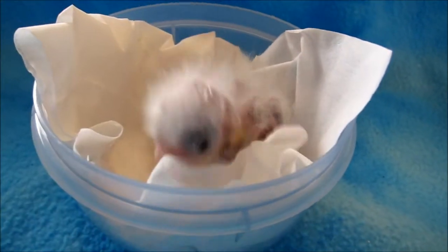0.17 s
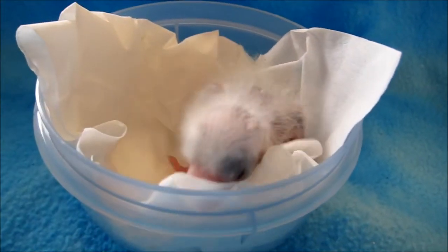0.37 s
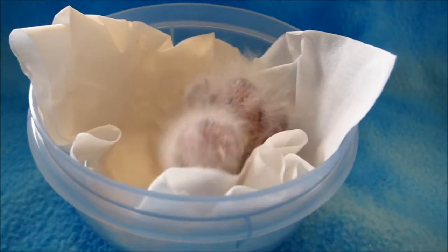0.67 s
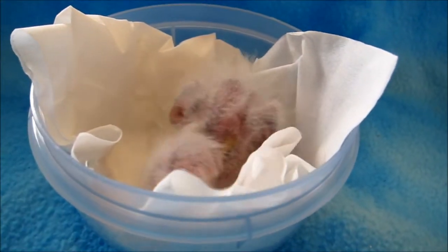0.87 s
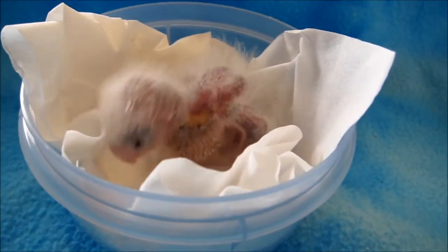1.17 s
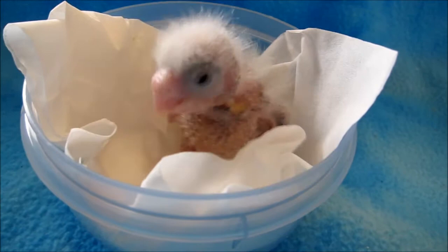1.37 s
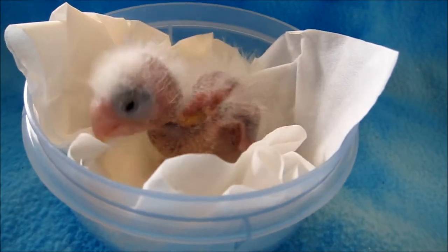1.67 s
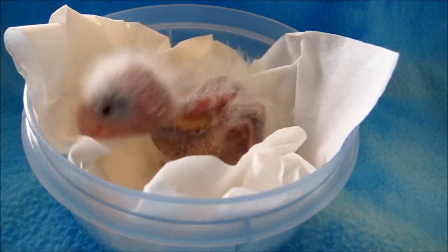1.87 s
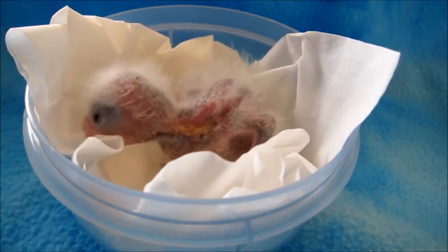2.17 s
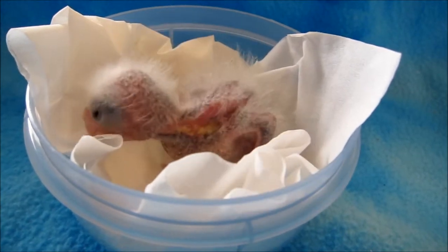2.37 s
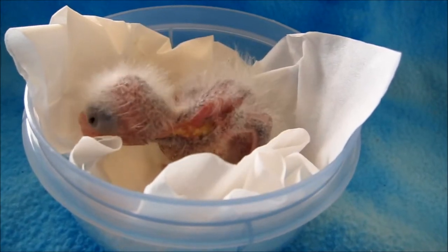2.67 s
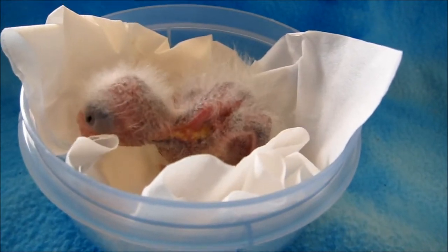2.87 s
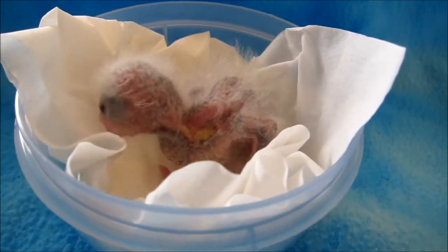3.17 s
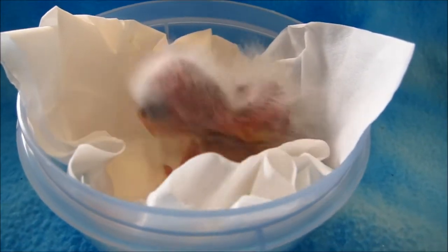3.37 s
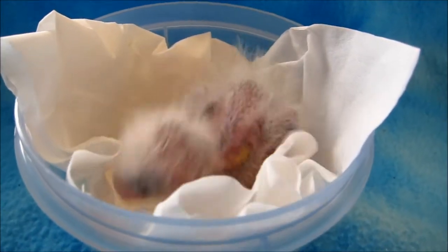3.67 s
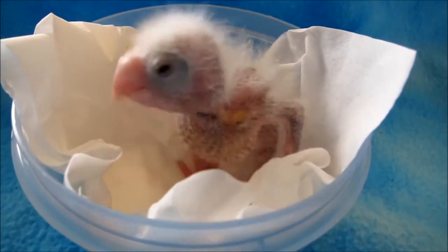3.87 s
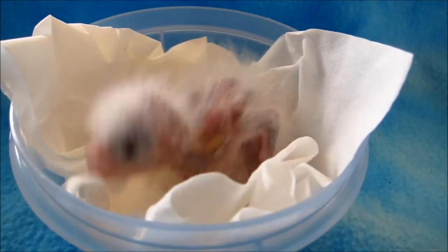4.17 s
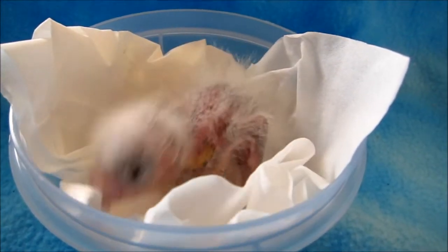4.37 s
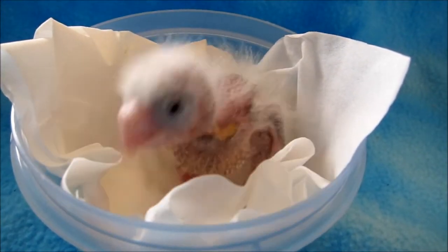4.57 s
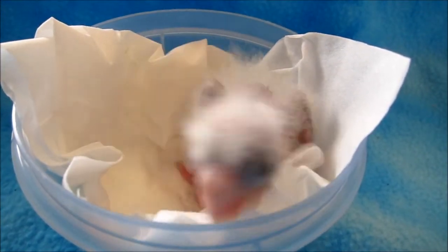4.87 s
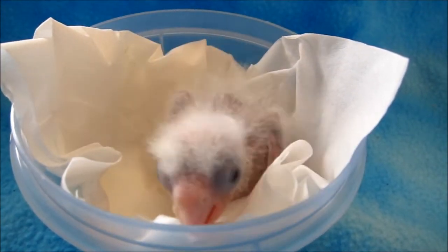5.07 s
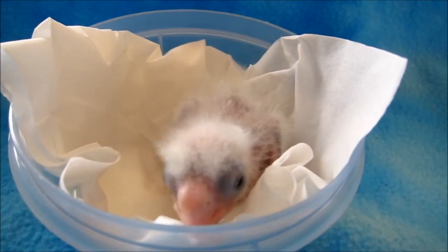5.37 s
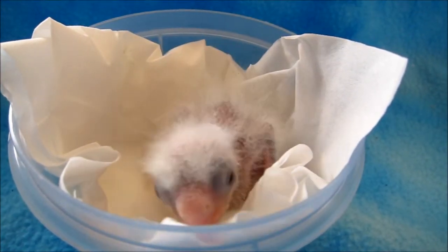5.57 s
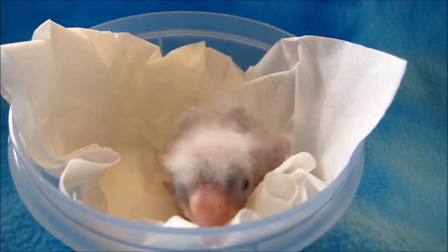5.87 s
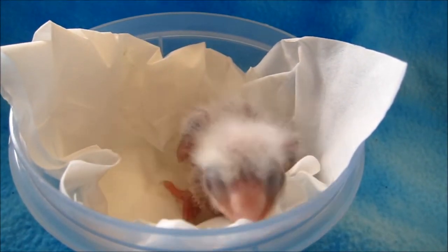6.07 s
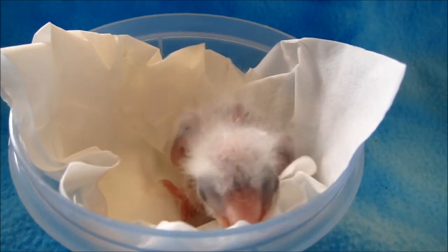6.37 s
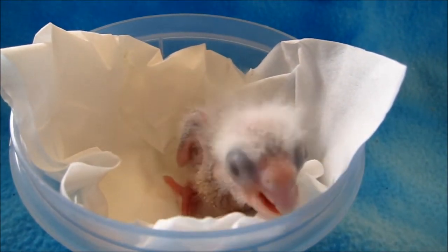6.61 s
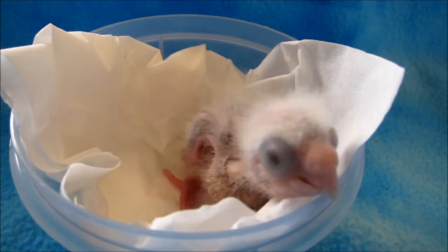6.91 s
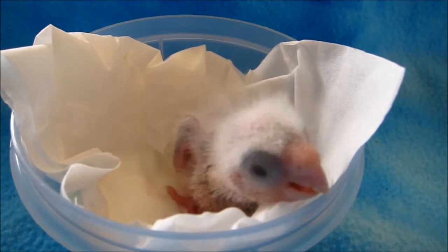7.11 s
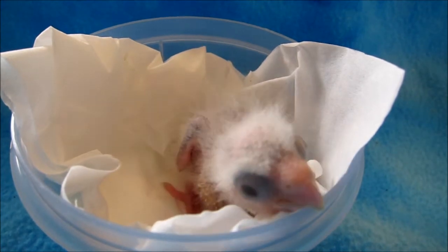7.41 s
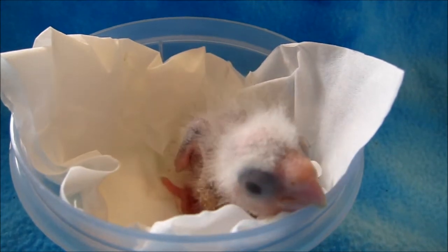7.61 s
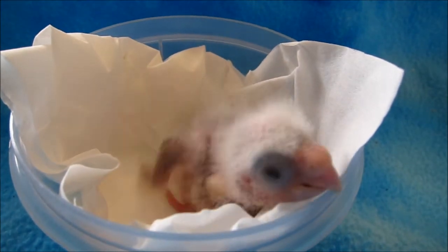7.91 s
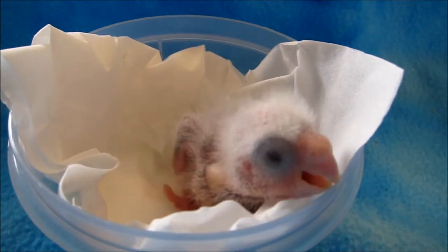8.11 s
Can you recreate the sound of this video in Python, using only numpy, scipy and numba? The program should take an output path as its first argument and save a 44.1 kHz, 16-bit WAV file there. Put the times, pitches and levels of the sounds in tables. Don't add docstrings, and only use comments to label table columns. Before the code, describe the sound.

A baby parrot calls about every second and a half: four rapid peeps, then a breathy, whistling rasp or near silence. The rasps begin soft, swell before the third run, fade, then return loudest before the last peeps. A thin whistle lingers briefly in the fifth run. Close stereo pickup, low hum dipping after the peeps, slight bowl and room echo.

```python
import sys
import numpy as np
from scipy import signal
from scipy.fft import rfft, irfft, next_fast_len
from scipy.io import wavfile
from scipy.ndimage import uniform_filter1d
from numba import njit

SR = 44100
rng = np.random.default_rng(int(sys.argv[2]) if len(sys.argv) > 2 else 0)


def voltage_ratio(decibels):
    exponent = np.asarray(decibels, float) / 20
    return 10 ** exponent


def master(y):
    cut = np.clip(np.atleast_2d(y).T, -1, 1)
    pcm = np.round(cut * 32767)
    wavfile.write(sys.argv[1], SR, pcm.astype(np.int16))


N = 363825

# time_s, level_db
HUM = [(0.0, -52.5), (1.7, -46.5), (2.3, -47.5), (3.1, -51), (4.7, -50.5), (6.25, -50), (7.9, -46.5)]
# pitch_hz, level_db (per Hz)
HUM_COLOUR = [(15, -31), (30, -24), (60, -14), (300, -4), (500, -9), (1000, -13), (2000, -12.5),
              (4000, -68), (7000, -30), (10000, -28.5), (16000, -35)]
# start_s, drop_db, recovery_s
DUCKS = [(.38, -7, 0.21), (1.82, -17.5, 0.34), (3.45, -3.5, 1), (4.78, -13, 0.94), (4.9, -7, .3),
         (6.3, -5, .3), (6.45, -13, 1), (7.97, -14.5, 0.99)]
# time_s, level_db, spread_s
SHUFFLES = [(1.45, 3, .05), (3.24, 9.5, 0.06), (4.72, 4, 0.023), (5.5, 4, .06)]
# time_s, level_db, spread_s, pitch_hz, width_hz
RUBS = [
    (1.0, -58, .06, 170, 120),
    (1.22, -58, .2, 1400, 300),
    (1.45, -57, .07, 700, 250),
    (4.225, -58, .025, 1120, 200),
    (5.5, -57, .09, 290, 150),
    (5.75, -59, .1, 200, 150),
]
# start_s, level_db, pitch_hz
TICKS = [
    (3.19, -48, 410),
    (3.874, -43, 1100),
    (5.352, -44, 1050),
    (5.929, -47, 2480),
]
# time_s, pitch_hz, fourth_partial_db, second_and_third_db
WHIMPER = [(6.63, 1250, -90, -90), (6.67, 1247, -25.5, -33), (6.8, 1258, -34, -44), (6.88, 1300, -38, -60),
           (6.91, 1318, -27, -62), (6.94, 1310, -36, -70), (7.04, 1295, -37, -90), (7.14, 1265, -90, -90)]

# time_s, air_flow_db, main_resonance_hz, beak_opening_db
RASPS = [
    [(0.19, -67, 4200, -9.5)],
    [(0.8, -43.5, 4650, 3.5), (0.874, -38, 4540, -6.5), (0.992, -39, 4440, -1.3), (1.168, -35, 4470, -0.7),
     (1.646, -38, 4560, 2.8), (1.76, -42, 4000, 7)],
    [(2.33, -37.5, 4120, 6), (2.366, -36, 4250, 5), (2.46, -31, 4100, 3.5), (2.54, -29.5, 4560, 1),
     (2.68, -30.5, 4390, 2.5), (2.728, -21, 4620, 2.8), (2.816, -25, 4600, 0)],
    [(2.982, -39, 4680, 4), (3.21, -37.5, 4660, 2.2)],
    [(3.95, -58.5, 4740, -15)],
    [(4.238, -71.5, 4360, 3), (4.27, -58.5, 4150, 0), (4.458, -58, 4400, 3.5), (4.528, -65.5, 4350, 1.5),
     (4.7, -63.5, 4500, -6.5)],
]
# time_s, air_flow_db, main_resonance_hz, beak_opening_db
LATE_RASPS = [
    [(5.42, -82, 4800, -3), (5.456, -50, 4700, 1), (5.696, -43.5, 4720, 0), (6.25, -41.5, 4650, 1.5)],
    [(6.55, -70, 4560, .1), (6.665, -40, 4800, 6), (6.691, -32, 4900, 1), (6.711, -35.5, 4700, 6),
     (6.775, -29.5, 4750, 5.5)],
    [(6.91, -36, 4300, 4.5), (7.032, -25.5, 4430, -6), (7.148, -24.5, 4330, -4.5), (7.18, -18, 4374, -7.5),
     (7.43, -22.5, 4156, -1), (7.6, -22, 3950, -0.2), (7.68, -20.5, 3760, -1.5), (7.8, -20.5, 3660, -2.3),
     (7.92, -22.5, 3760, 0.3)],
    [(8.035, -46, 4300, 6.5), (8.2, -38.5, 4070, -2.5)],
]
RASP_WIDTH_HZ = [150, 300, 240, 480]
# pitch_hz, level_db
RASP_HISS = [(600, -59), (1300, -1), (2000, 8), (4500, 11.5), (7000, 11), (10300, 8.5), (13000, -5.5),
             (16000, -40)]
# first_db, second_db, fourth_db
RASP_COLOUR = [(-13, 16.5, 8.5), (-13, -5.5, -17), (-8, -10, -9.5), (-13, -5, -24.5), (9, 10, -5.5),
               (9, 11, 6), (-46, -23.5, -8), (-27.5, -12, -11.5), (-8, -12.5, -8.5), (-3, 4, -8)]
# first_share_of_main, second_hz, fourth_multiple_of_main
RASP_THROAT = [((.53, 3600, 1.43), (.53, 3500, 1.43)), ((.534, 3420, 1.3), (.534, 3050, 1.3)),
               ((.48, 3400, 1.47), (.49, 3400, 1.43)), ((.478, 3600, 1.32), (.478, 3440, 1.32)),
               ((.45, 3500, 1.42), (.45, 3500, 1.42)), ((.38, 3450, 1.54), (.48, 2500, 1.2)),
               ((.42, 3100, 1.27), (.42, 3400, 1.27)), ((.31, 3700, 1.42), (.31, 4100, 1.42)),
               ((.5005, 3250, 1.49), (.5005, 2960, 1.49)), ((.46, 3650, 1.36), (.46, 3600, 1.36))]
# time_s, level_db, spread_s
SURGES = [(7.21, -0.5, 0.013), (7.396, -4, 0.0063), (7.43, 5, 0.0052), (2.39, 6.5, 0.032),
          (2.49, -6.5, 0.039), (2.555, 5.5, 0.069)]

# start_s, length_s, crest_hz, crest_slope_hz, half_pitch_db
PEEPS = [(.2068, 0.093, 2506, -70, -13), (.346, 0.092, 2778, -161, -15.5), (.503, 0.09, 2693, -138, -39),
         (.6876, 0.094, 2545, -216, -36), (1.7675, .0865, 2442, 180, -12.5),
         (1.9046, .089, 2554, -400, -24), (2.051, 0.089, 2506, -170, -29), (2.2243, 0.086, 2406, -130, -26),
         (3.2315, 0.093, 2490, -84, -17), (3.369, 0.087, 2715, -243, -33), (3.5217, 0.084, 2487, -557, -27),
         (3.7326, 0.1, 2403, -480, -13.5), (4.7406, 0.094, 2330, 12, -13),
         (4.8786, 0.09, 2425, -120, -10.5), (5.0321, 0.087, 2336, -420, -14.5),
         (5.2214, 0.093, 2260, -380, -13), (6.2671, 0.097, 2403, 358, -17),
         (6.4155, 0.088, 2681, -212, -21), (6.5664, .0844, 2598, -52, -20), (6.7882, 0.1, 2262, -200, -41),
         (7.9283, 0.088, 2248, 20, -36), (8.0658, 0.087, 2434, -320, -22), (8.219, .088, 2410, -50, -24)]
# second_partial_db, then against it first_db, third_db, fourth_db; swell_db
RUNS = [(-13, 3, -3.5, -7, 5.5), (-12.5, 1.5, -8, -15.5, 7.5), (-12.5, 4, -7, -11, 8),
        (-13, 0.5, -3.5, -7.5, 0.5), (-11, 0.3, -2, -7, -0.4), (-12.5, -2, -2, -12.5, 3.5)]
# rise_ms, attack_ms
ONSETS = [(9.5, 9.9), (10.2, 6.2), (12.9, 5.5), (9.6, 19.2), (10.3, 13.7), (11.7, 13.3)]
# level_db, first_db, fourth_db, swell_db, attack_share
PLACES = [(-0.9, 2.05, 1.5, 2.3, 0.52), (0.94, -0.85, 1.7, -2.5, 1.08), (-0.1, 0.8, 1.2, 0.1, 1.23),
          (-0.8, 0.15, -1.5, -3.5, 1.06)]
# level_db, first_db, third_db, fourth_db, upper_db
EFFORT = [(-2, 1, 3, 3, 0), (0, -1, 2, 0, 0), (0, -2, 1, -1, 2), (0, -1, -3, -3, -3), (0, -2, 1, 2, 0),
          (0, -1, 0, -1, -5), (0, -2, 0, -2, -8), (0, -3, -2, -1, -3), (0, -2, -1, 0, 2),
          (1, -6, 0, -2, -6), (-1, -3, -1, -4, -3), (-1, 0, 0, 0, 6), (0, -2, -1, -1, -3), (0, 0, 2, 0, -3),
          (0, -2, -1, -1, -2), (0, 0, -1, -2, 2), (0, -2, -1, 0, -2), (1, -2, 0, -2, -3), (0, -1, 1, 0, -1),
          (1, -2, 0, 0, 0), (0, 0, -1, -6, 0), (-1, 0, 0, -2, -3), (0, 0, 0, 0, 0)]
# tightening_share, letting_go_ms, half_pitch_patch_place (share of length),
# patch_spread (share of length), first_puff_db
MANNER = [(.95, 6.6, .5, .2, -15), (.95, 8, .1, .3, -19), (1.05, 7.5, .3, .6, -13),
          (1.05, 6.6, .3, .6, -18), (.9, 7, .5, .6, -24), (.95, 7.5, .8, .5, -20), (1.1, 9, .6, .6, -12),
          (.95, 8, .5, .6, -12), (.9, 6.6, .4, .3, -30), (1.02, 9, .4, .6, -18), (1.1, 6.6, .4, .6, -15),
          (.85, 6.6, .45, .15, -14), (.9, 6.6, .6, .3, -8), (1.02, 8, .6, .3, -18), (1.02, 7, .55, .2, -16),
          (.9, 7.5, .45, .35, -17), (.95, 6.6, .8, .4, -15), (1.05, 8, .6, .6, -18), (1.02, 9, .3, .6, -14),
          (.92, 6.6, .6, .6, -17), (1.02, 7.5, .8, .4, -17), (.95, 7.5, .6, .6, -17),
          (1.02, 7, .5, .6, -19)]
# time_s, level_db, spread_s
PEEP_RISES = [(0.229, 4, 0.0076), (.735, 2.5, 0.03), (1.783, 7, 0.0069), (2.13, 2.5, 0.0089),
              (2.302, 3, 0.0085), (3.41, 2.5, 0.03), (3.56, 3.5, 0.012), (3.744, 4, 0.006), (3.825, 3, .008),
              (3.6, 2.5, .012), (4.75, 5.5, 0.0055), (4.825, 1.5, 0.0067), (5.065, 2.5, 0.013),
              (5.11, 2.1, 0.0067), (5.255, .8, .015), (7.955, 3.5, 0.014), (6.281, 0.5, .006),
              (6.351, 1.5, .02), (6.46, 0, 0.031), (6.84, 1.5, 0.071), (8.11, 2.5, 0.053)]
# time_s, rise_hz, spread_s
KINKS = [(.268, 170, .012), (3.292, 120, 0.01), (6.327, 57, 0.0117), (1.952, 114, 0.0085),
         (4.8, 42, 0.0109)]
# time_s, left minus right low_partials_db, third_db, fourth_db; left_lead_rad
HEAD = [(.25, -3.5, 3.5, 9, 0.96), (.73, -3.2, 1, 2.5, 0.84), (1.8, -0.5, 8.5, 20.5, 5),
        (1.95, -0.5, 9, 12.5, 4.5), (2.1, -1.1, 5, 5.5, 4.5), (2.27, 0.5, 3, 5, 1.5),
        (3.27, -2.5, 3, 14, 1.2), (3.56, 0, 0, 5.5, 1.62), (3.78, 0.8, 4.5, 18, 1.4),
        (4.78, -.2, 4, 8.5, 0.6), (4.92, -2.5, 1, 5.5, 0.33), (5.26, -2.1, 1.5, 8, 0.66),
        (6.31, -4, -1, 4.5, 0.2), (6.6, -2.5, -0.5, 2, 0.6), (6.84, -3, -1, -1.5, -4.5),
        (7.972, -5.5, -4, -3, -1.5), (8.1, -4.5, -3.8, -3, -4.5), (8.26, -5, -6, -7, -0.2)]
# pitch_hz, width_hz, level_db
WALL = [(5150, 150, -2), (4950, 130, -9), (4850, 200, -1), (4700, 200, -1), (4500, 200, -1),
        (4500, 200, -1)]
# pitch_hz, level_db
TRACT = [(500, -17), (850, -20.5), (1150, -7), (1600, -18.5), (2400, -3.5), (3300, -1), (4200, 0.5),
         (5000, 1), (6500, 3.5), (7600, -1.5), (9500, 0), (13000, -5), (16000, -16)]

ROOM_T60_S, ROOM_DB = .7, -27
BOWL_T60_S, BOWL_DB = .09, -25
REST_HZ = 1121
DOME_HZ = 257
RISE_MS_PER_KHZ = 1.12
LET_GO_S = .009
WOBBLE = 0.0022
UPPER_DB_PER_ORDER = -1.5
SLACK_DULL_DB = -2.5
LEG_DB = -2
GAP_HZ, GAP_WIDTH_HZ, GAP_DB = 1800, 150, -2
THIRD_LEAD_SHARE = 0.34
NOTCH_HZ, NOTCH_WIDTH_HZ = 8250, 1000
TOP_HZ = 15650


def shape(x, points):
    hz, db = np.transpose(points)
    size = next_fast_len(x.shape[-1])
    bins_hz = np.arange(size // 2 + 1) * SR / size
    gain = voltage_ratio(np.interp(np.log(bins_hz + 1), np.log(hz), db))
    return irfft(rfft(x, size) * gain, size)[..., :x.shape[-1]]


def walk(rate, count):
    pole = np.exp(-2 * np.pi * rate / SR)
    x = signal.lfilter([1], [1, -2 * pole, pole ** 2], rng.standard_normal(count + 2000))[2000:]
    return x / x.std()


def bump(x, centre, spread):
    return np.exp(-((x - centre) / spread) ** 2)


def bumps(t, events):
    return sum(height * bump(t, at, spread) for at, height, spread in events)


@njit
def throat(x, hz, width):
    y, b, l, b2, l2 = np.empty(len(x)), 0., 0., 0., 0.
    for i in range(len(x)):
        g, k = np.tan(np.pi * hz[i] / SR), width[i] / hz[i]
        v = (b + g * (x[i] - l)) / (1 + g * (g + k))
        b, l = 2 * v - b, l + 2 * g * v
        v = (b2 + g * (k * v - l2)) / (1 + g * (g + k))
        b2, l2, y[i] = 2 * v - b2, l2 + 2 * g * v, k * v
    return y


def hum(side_db=-11):
    t = np.arange(N) / SR
    mid, side = shape(rng.standard_normal((2, N)), HUM_COLOUR)
    held_db = sum(duck_db * (t > s) * np.exp(-np.abs(t - s) / recover) for s, duck_db, recover in DUCKS)
    db = np.interp(t, *np.transpose(HUM)) + uniform_filter1d(held_db, size=SR // 12)
    db = db + bumps(t, SHUFFLES)
    gain = voltage_ratio(db + 1.0 * walk(2.5, count=N)) / mid.std()
    return gain * (mid + voltage_ratio(side_db) * side * np.array([[1], [-1]]))


def tail(x):
    t = np.arange(int(.6 * SR)) / SR
    bowl = voltage_ratio(BOWL_DB) / np.sqrt(BOWL_T60_S) * 1000. ** (-t / BOWL_T60_S) * (t > .001)
    room = voltage_ratio(ROOM_DB) / np.sqrt(ROOM_T60_S) * 1000. ** (-t / ROOM_T60_S) * (t > .008)
    echo = rng.standard_normal((2, len(t))) * (bowl + room) * np.sqrt(2 * np.log(1000) / SR)
    echo = shape(echo, [(800, 14.5), (2500, 4.0), (5000, 8.0), (7000, -0.5), (12000, -0.5)])
    return signal.fftconvolve(x.mean(axis=0, keepdims=True), echo, axes=1)[:, :N]


def rubs():
    t = np.arange(N) / SR
    s, _, _, hz, width = np.transpose(RUBS)
    hz, width = np.interp(t, s, hz), np.interp(t, s, width)
    swell = sum(voltage_ratio(db) * bump(t, at, spread) for at, db, spread, *_ in RUBS)
    grit = throat(rng.standard_normal(N), hz, width) * np.sqrt(SR / width)
    return swell * grit * voltage_ratio(2.5 * walk(12, count=N))


def ticks(ring_s=0.0045):
    out, t = np.zeros(N), np.arange(600) / SR
    for s, db, hz in TICKS:
        burst = np.sin(2 * np.pi * hz * t) + .4 * rng.standard_normal(len(t))
        out[int(s * SR):int(s * SR) + len(t)] += voltage_ratio(db) * burst * np.exp(-t / ring_s)
    return out


def whimper():
    t = np.arange(N) / SR
    s, hz, high_db, low_db = np.transpose(WHIMPER)
    fray = np.interp(t, [6.8, 6.9], [.2, .45]) * walk(120, count=N)
    phase = 2 * np.pi * np.cumsum(np.interp(t, s, hz)) / SR + fray
    low = voltage_ratio(np.interp(t, s, low_db)) * (np.sin(2 * phase) + 0.68 * np.sin(3 * phase))
    high = voltage_ratio(np.interp(t, s, high_db)) * np.sin(4 * phase)
    return (low + high) * voltage_ratio(2.5 * walk(50, count=N))


def rasps(burst_db=-0.05, throb_db=0.72, third_db=-3, pan_db=-1.2):
    t = np.arange(N) / SR
    apart = .5
    rows = []
    for rasp, colour, ends in zip(RASPS + LATE_RASPS, RASP_COLOUR, RASP_THROAT):
        first_and_last = [rasp[0][0], rasp[-1][0]]
        for row in rasp:
            glides = [np.interp(row[0], first_and_last, glide) for glide in zip(*ends)]
            rows.append((*row, *colour, *glides))
    s, *cols = np.array(rows).T
    flow_db, main_hz, open_db, *side_db, share, second_hz, multiple = (np.interp(t, s, c) for c in cols)
    low_db, second_db, fourth_db = (db + open_db for db in side_db)
    levels_db = low_db, second_db, third_db, fourth_db
    centres_hz = share * main_hz, second_hz, main_hz, multiple * main_hz

    out, drift = np.zeros((2, N)), walk(9.9, count=N)
    for db, centre, width in zip(levels_db, centres_hz, RASP_WIDTH_HZ):
        width = width * np.interp(flow_db, [-40, -28], [1.7, .75])
        centre = centre * (1 + .008 * drift)
        mid, side = (throat(air, centre, 2.03 * width) for air in rng.standard_normal((2, N)))
        db = db + 2.2 * walk(16, count=N)
        out += voltage_ratio(db) * np.sqrt(SR / 2 / width) * np.array([mid + apart * side, mid - apart * side])

    mid, side = shape(rng.standard_normal((2, N)), RASP_HISS)
    focus_db = np.interp(flow_db, [-36, -26], [0, -4])
    hiss_db = focus_db + np.minimum(.5 * (second_db + fourth_db), 2)
    out += voltage_ratio(hiss_db) * np.array([mid + apart * side, mid - apart * side])

    flow_db = flow_db + bumps(t, SURGES)
    flow = voltage_ratio(flow_db + burst_db * walk(90, count=N) + throb_db * walk(16, count=N))
    out[1] = np.roll(out[1], 1)
    return 0.77 * out * flow * voltage_ratio(pan_db / 2 * np.array([[1], [-1]]))


def peep(arch, voice, head, attack_ms, manner, wall, lead=0.0029, trail=0.02, release=0.017):
    start, length, crest_hz, slope_hz, rise_ms, fall_ms = arch
    level_db, first_db, third_db, fourth_db, half_pitch_db, swell_db, upper_db = voice
    patch_place, patch_spread, puff_db = manner
    t = np.arange(int((lead + length + trail) * SR)) / SR - lead
    count, along = len(t), t / length - .5

    tighten = 1 - np.exp(-t.clip(0) / rise_ms * 1e3)
    let_go = 1 - np.exp(-np.exp((length - LET_GO_S - t) / fall_ms * 1e3))
    tension = tighten * let_go
    crest = crest_hz - 1000 + slope_hz * along + DOME_HZ * (.07 - along ** 2)
    hz = np.maximum(1000 + crest * tension, REST_HZ)
    hz = hz - 200 * (t - length).clip(0) / trail
    hz = hz + bumps(start + t, KINKS)
    hz = hz * (1 + WOBBLE * walk(27.7, count))

    slack = (1 - tension) ** 1.6 * np.where(t > length / 2, 1, .5)
    rough = .03 + .55 * slack
    phase = 2 * np.pi * np.cumsum(hz) / SR + .9 * rough * walk(1000, count)

    set_in = 1 - np.exp(-(t + lead) / attack_ms * 1e3)
    air = set_in * (1 - np.exp(-(length + trail - t) / release)) ** 3.28
    air = air + voltage_ratio(puff_db + 2.5) * (t > -.002) * np.exp(-(t + lead) / .0071)
    air = air * voltage_ratio(level_db + swell_db * along + 0.25 * walk(52, count))
    air = air * voltage_ratio(bumps(start + t, PEEP_RISES))

    patch_db = -14 * (1 - bump(t / length, patch_place, patch_spread))
    halves = voltage_ratio(half_pitch_db + patch_db + 3 * walk(60, count)) * np.exp(1.2j * walk(130, count))

    k = np.arange(.5, 12, .5)[:, None]
    top_db = upper_db + 9 * UPPER_DB_PER_ORDER
    order_db = np.interp(k, [1, 2, 3, 4, 5, 14], [first_db, 0, third_db, fourth_db, upper_db, top_db])
    order_db = order_db + SLACK_DULL_DB * (k - 2).clip(0, 4) * (1 - tension) * (t < length / 2)
    order_db = order_db + wall[2] * bump(k * hz, wall[0], wall[1])
    half_db = np.interp(k, [.5, 1.5, 2.5, 4.5], [-27, -8.5, -1.0, 1])
    lines = voltage_ratio(order_db) * (k * hz < TOP_HZ) * np.exp(1j * (k * phase - 0.281 * k ** 2))
    pop_db = 6 * np.exp(-(t + lead) / 0.022)
    slide_db = LEG_DB * 10.5 * tension * (1 - tension)
    lines[1] *= voltage_ratio(pop_db + GAP_DB * bump(hz, GAP_HZ, GAP_WIDTH_HZ) + slide_db)
    lines[::2] *= halves * voltage_ratio(half_db[::2])

    orders = [1, 2, 3, 4, 5.5]
    pan_db = np.interp(k, orders, [*head[:4], head[3] - 11])
    lead_rad = np.interp(k, orders, [0.055 * head[4], head[4], head[5], head[5], head[5] + 1.1])
    turn = (voltage_ratio(pan_db / 2) * np.exp(.5j * lead_rad)).T
    voiced = -(np.vstack([turn, 1 / turn]) @ lines).real * (1 + 1.2 * rough * walk(1400, count))

    leak = np.gradient(rng.standard_normal(count) + 1.7 * rng.standard_normal((2, count)), axis=1)
    leak = leak * (voltage_ratio(-36) + .25 * np.abs(halves)) * (1 + 9 * slack)
    return int((start - lead) * SR), air * (voiced + leak)


def peeps():
    out = np.zeros((2, N + SR // 4))
    s, *turn = np.transpose(HEAD)
    for i, (start, length, crest_hz, slope_hz, half_db) in enumerate(PEEPS):
        run = i // len(PLACES)
        place_db, place_first, place_fourth, place_swell, attack_share = PLACES[i % len(PLACES)]
        db, first_db, third_db, fourth_db, swell_db = RUNS[run]
        rise_ms, attack_ms = ONSETS[run]
        more, first, third, fourth, upper = EFFORT[i]
        share, fall_ms, *manner = MANNER[i]
        rise_ms = share * (rise_ms + RISE_MS_PER_KHZ * slope_hz / 1e3)
        arch = start, length, crest_hz, slope_hz, rise_ms, fall_ms
        fourth_db = fourth_db + place_fourth
        voice = (db + place_db + more, first_db + place_first + first, third_db + third, fourth_db + fourth,
                 half_db, swell_db + place_swell, fourth_db + UPPER_DB_PER_ORDER + upper)
        low, third, fourth, lead = (np.interp(start + length / 2, s, c) for c in turn)
        head = low, low, third, fourth, lead, THIRD_LEAD_SHARE * lead
        at, call = peep(arch, voice, head, attack_ms * attack_share, manner, WALL[run])
        out[:, at:at + call.shape[1]] += call
    return shape(out, TRACT)[:, :N]


def scene():
    chick = peeps() + rasps() + whimper() + ticks()
    return chick + tail(chick) + hum() + rubs()


def roll_off(x):
    return signal.sosfilt(signal.butter(12, 15810, fs=SR, output="sos"), x)


def record(dry):
    notch = signal.iirnotch(NOTCH_HZ, NOTCH_HZ / NOTCH_WIDTH_HZ, fs=SR)
    x = signal.lfilter(*notch, signal.lfilter(*notch, dry))
    rounded = np.tanh(.55 * x) / .55
    mix = signal.sosfilt(signal.ellip(8, .2, 70, TOP_HZ, fs=SR, output="sos"), rounded)
    return roll_off(mix)


dry = scene()
out = record(dry)
master(out)
```